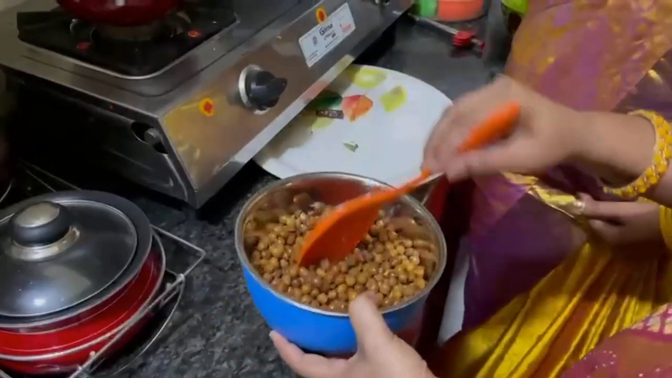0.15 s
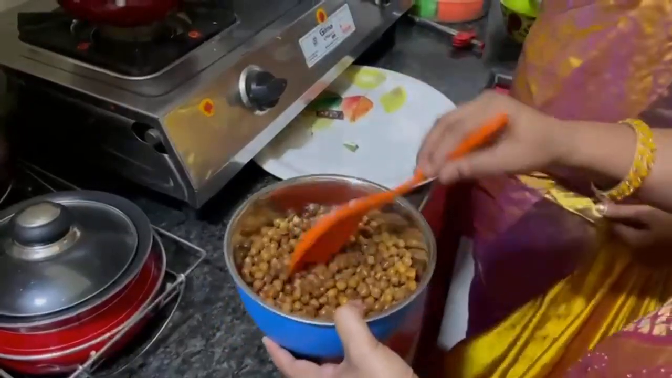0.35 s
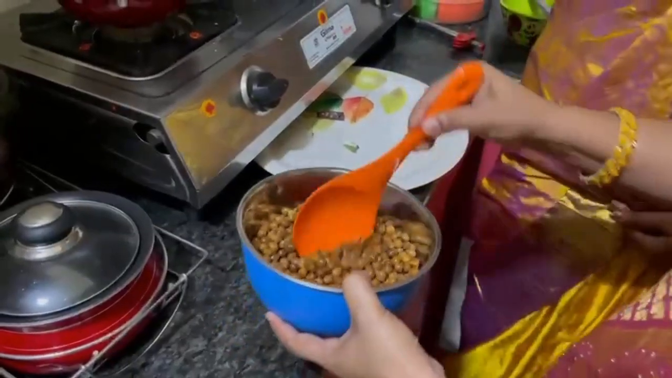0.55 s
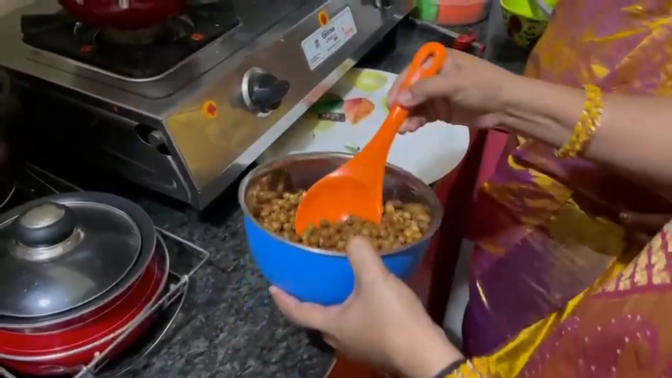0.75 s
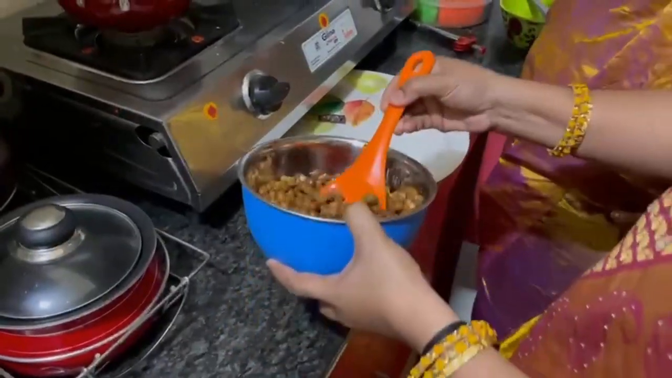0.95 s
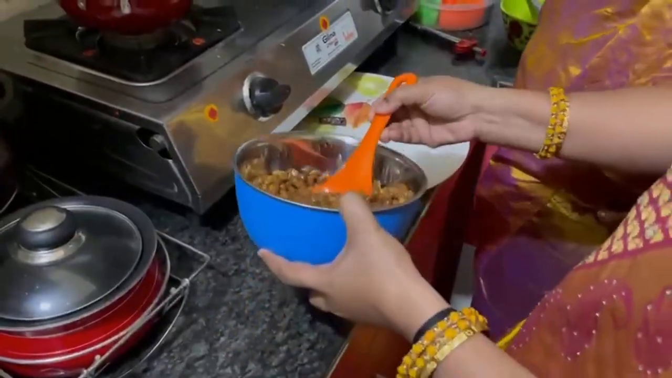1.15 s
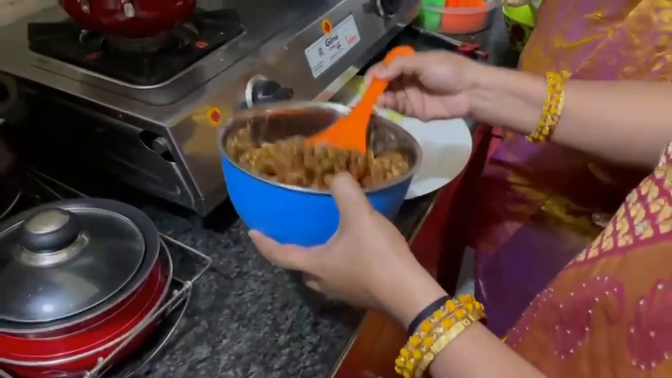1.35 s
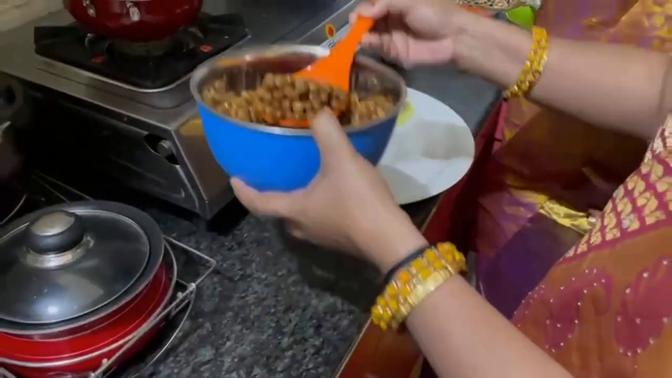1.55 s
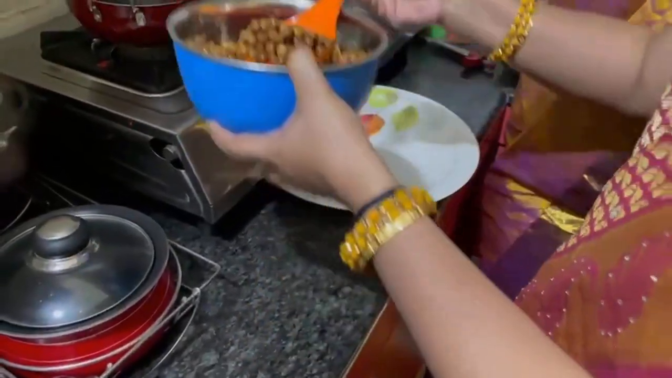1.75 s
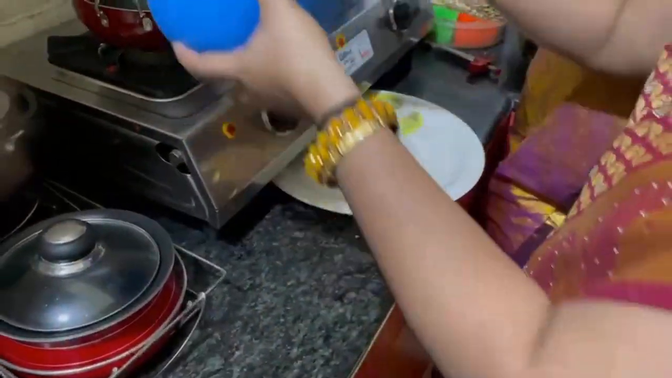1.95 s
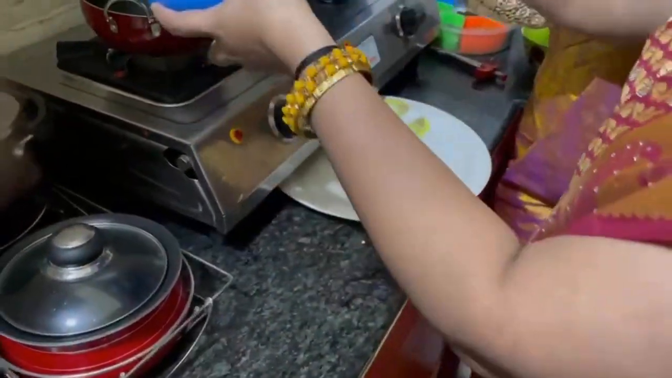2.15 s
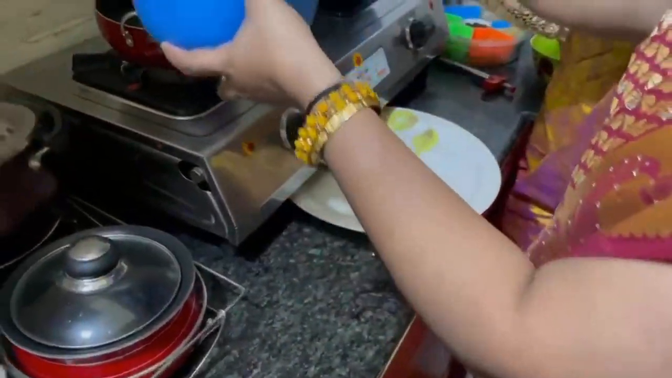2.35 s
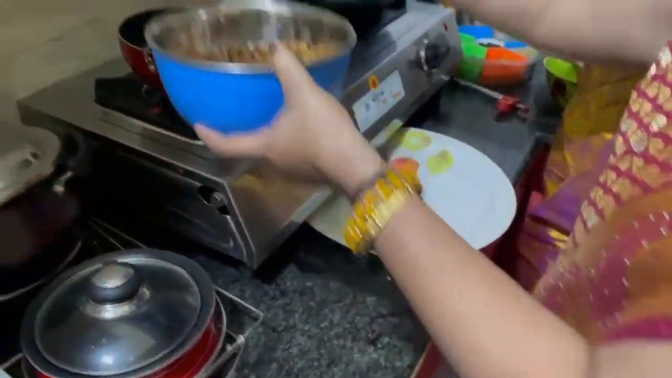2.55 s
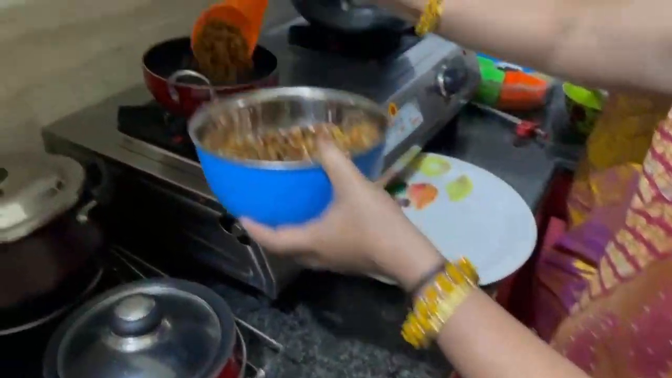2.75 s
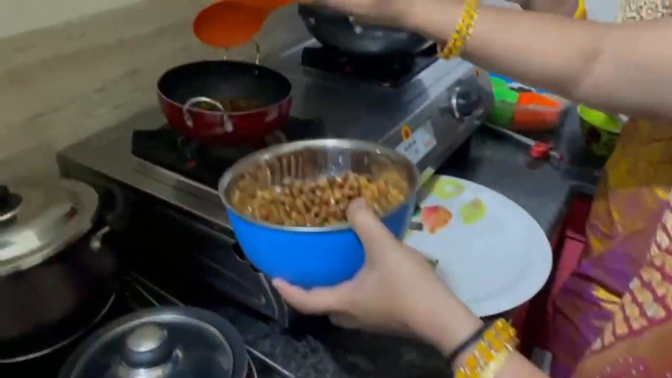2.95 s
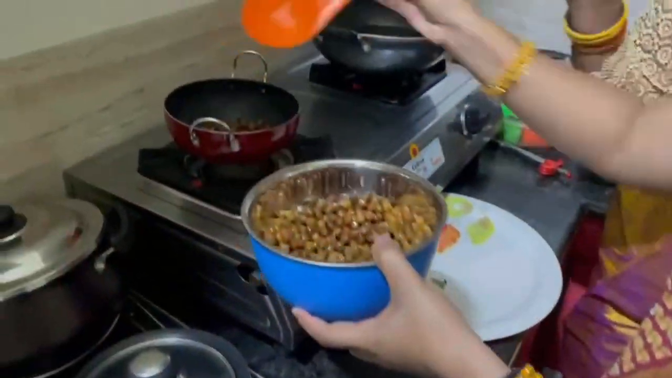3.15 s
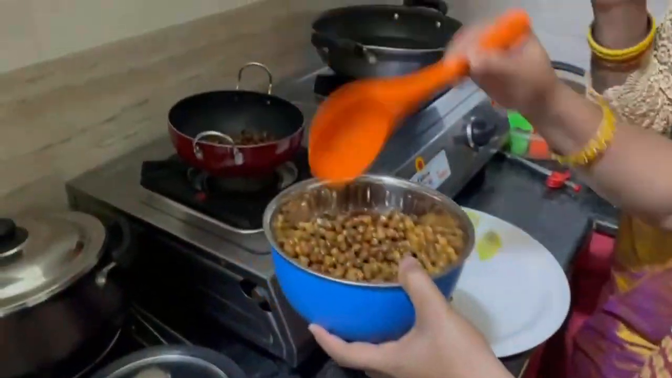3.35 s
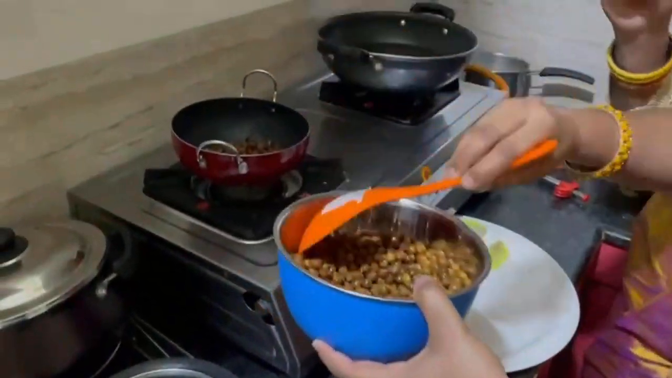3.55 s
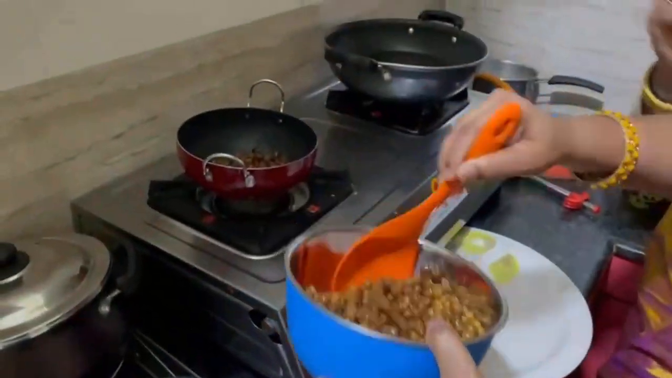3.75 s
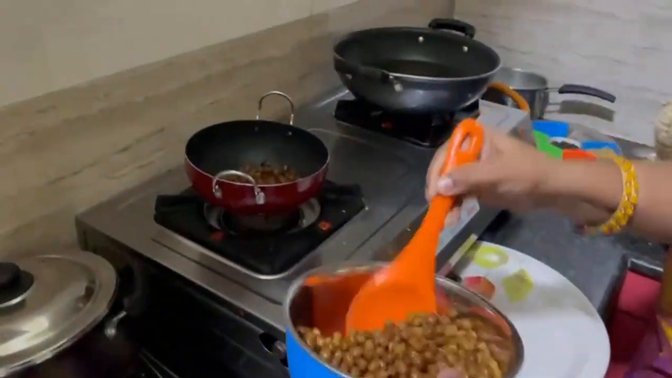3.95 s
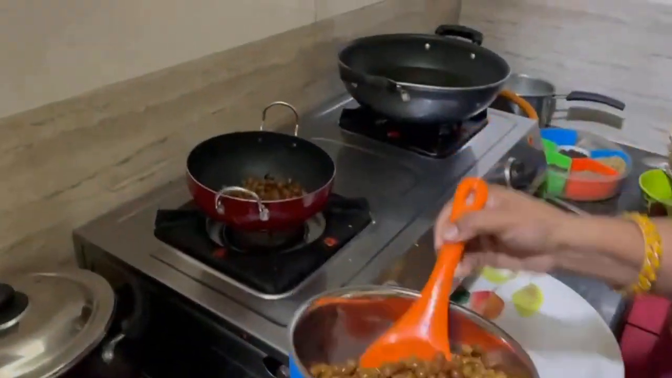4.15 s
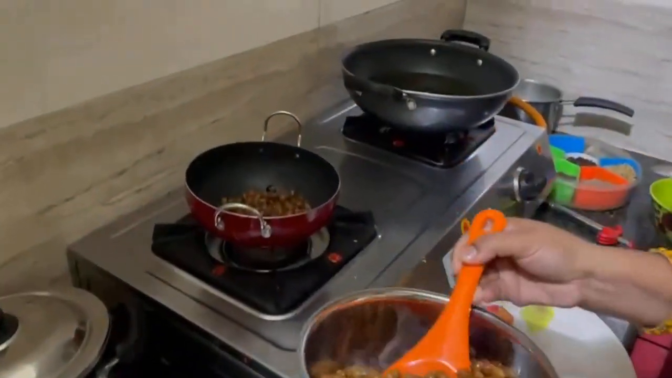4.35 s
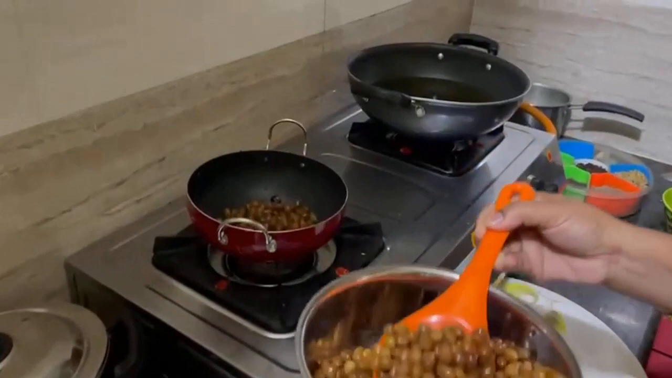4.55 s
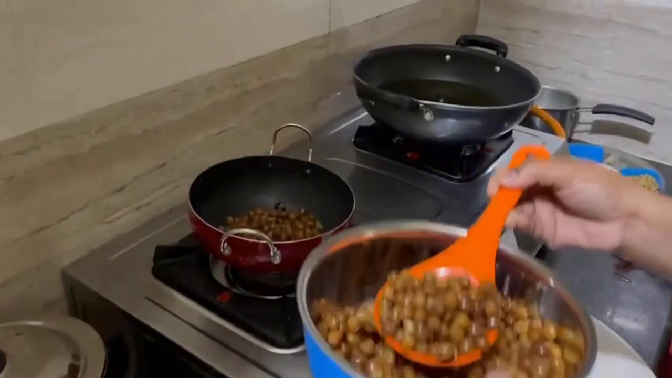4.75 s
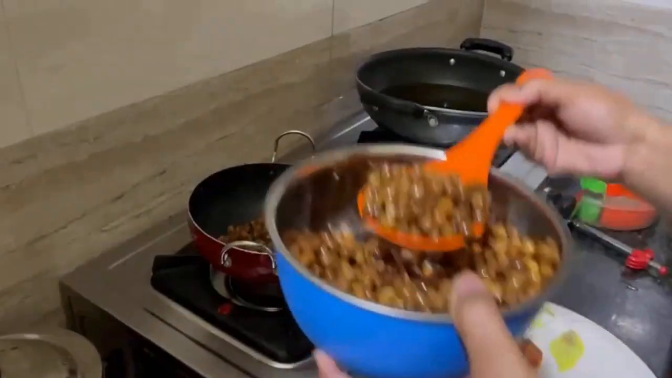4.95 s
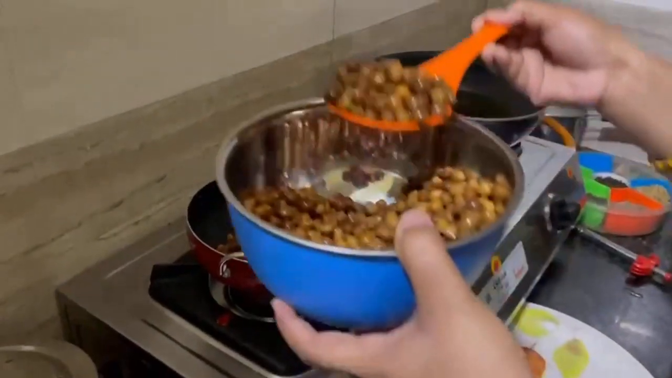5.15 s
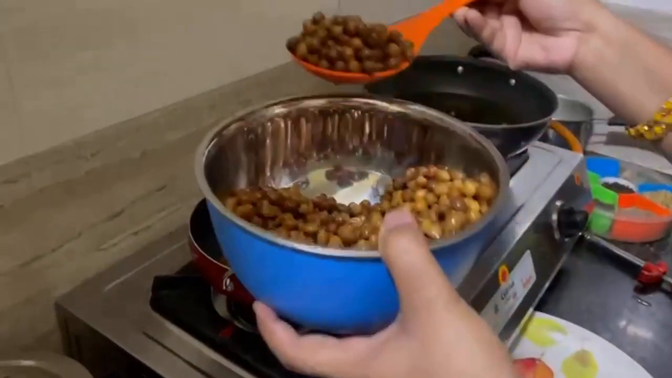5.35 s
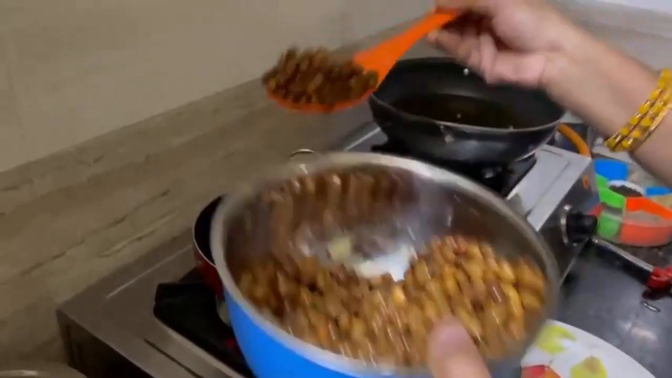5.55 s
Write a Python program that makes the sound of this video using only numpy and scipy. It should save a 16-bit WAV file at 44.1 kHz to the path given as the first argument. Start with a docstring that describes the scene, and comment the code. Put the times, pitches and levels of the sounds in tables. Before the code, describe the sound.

Chickpeas click and knock in a ringing steel bowl before hitting a pan of oil with sharp crackles and a steady sizzle.

```python
"""A plastic ladle stirs chickpeas in a hand-held steel bowl over a low kitchen rumble: the peas click,
roll and knock, and the steel rings in its modes. At about 2.7 s they are tipped into a pan of hot oil,
where steam bubbles burst in a sizzle and drops of water spit. From about 3.6 s the ladle digs into the
bowl again, scraping and rubbing, while the frying goes on. Two microphone ports hear it all."""
import sys
import numpy as np
from scipy import signal
from scipy.fft import rfft, irfft, next_fast_len
from scipy.io import wavfile
from scipy.ndimage import uniform_filter1d

SR = 44100
rng = np.random.default_rng(int(sys.argv[2]) if len(sys.argv) > 2 else 0)


def output_pcm(signal):
    """Save a mono or channel-first signal as 16-bit PCM at the path in sys.argv[1].

    Samples are clipped to [-1, 1] before scaling.
    """
    pcm = np.clip(np.atleast_2d(signal).T, -1, 1) * 32767
    wavfile.write(sys.argv[1], SR, np.round(pcm).astype(np.int16))


N = 250523
EVENT_SAMPLES = 8192

# Spectra of rumble, peas, fizz and oil. Each row: frequency in Hz, relative level in dB.
RUMBLE_SPECTRUM = [(13, -19), (22, -35), (37, -2.5), (59, 8.5), (112, 1), (161, -5), (193, -9),
                   (408, -8), (484, -20), (795, -19), (900, -58), (1170, -57), (1980, -120)]
PEA_SPECTRUM = [(500, -19), (900, -5.5), (1500, -9), (2500, -4.5), (4500, -8.5), (6000, -10), (7500, -15.5),
                (10000, -80)]
FIZZ_SPECTRUM = [(4000, -28.5), (6000, -9.5), (8000, -4), (10000, -4.5), (11300, -6), (12000, -16.5)]
OIL_SPECTRUM = [(500, -20.5), (900, -9.5), (1500, -9.5), (2500, -6), (3800, -9), (6000, -8), (7500, -10),
                (10000, -35.5)]
# Stirred peas and frying oil. Each row: time in seconds, gain in dB, treble lift in dB.
STIRRING = [(0.0, -50, 6), (0.32, -56.5, 6.5), (0.5, -47.5, 2), (0.58, -54.5, 2.5), (0.86, -52, 1),
            (1.09, -52, -5), (1.19, -59.5, 6), (1.3, -52, 6.5), (1.54, -55, 1.5), (1.64, -51, 0.5),
            (1.86, -59.5, 3), (2.23, -62.5, 5), (2.42, -63, 7), (2.66, -68, 5.5), (2.72, -69, -8)]
FRYING = [(2.68, -53, -8.5), (2.91, -37, 1), (3.0, -44, 6.5), (3.21, -45, 4), (3.52, -44, 2),
          (3.71, -41.5, 2.5), (4.02, -42.5, 3.5), (4.77, -38.5, 3.5), (5.35, -39, 2.5), (5.68, -38.5, 4)]
# Ringing of the steel bowl that colours the clicking peas.
# Each row: centre in Hz, width in Hz, boost in dB.
BOWL_RESONANCES = [(1090, 140, 10), (1870, 160, 7), (2090, 120, 6), (3400, 200, 3), (4200, 150, 0),
                   (4750, 100, 2.5)]
# Peas tumbling against the wall. Each row: time in seconds, gain in dB, centre of the clatter in Hz.
TUMBLING = [(0, -46.5, 1080), (.24, -46, 1100), (.34, -49, 1080), (.58, -43, 1080), (.66, -38.5, 1400),
            (.8, -53, 1190), (.88, -40, 1380), (.95, -44, 1250), (.99, -48.5, 1150), (1.15, -48, 1050),
            (1.37, -46.5, 1180), (1.5, -47, 754), (1.6, -45.5, 950), (1.83, -54, 1170), (2.56, -62, 1070),
            (2.67, -54, 1170), (2.93, -40.5, 1080), (3.23, -51.5, 1080), (3.57, -42.5, 970),
            (3.72, -43.5, 840), (3.99, -37, 1080), (4.25, -47, 880), (4.32, -39, 1150), (4.36, -33, 1000),
            (4.45, -37.5, 900), (4.5, -30.5, 890), (4.56, -40, 770), (4.64, -43, 666), (4.78, -41, 920),
            (5.68, -46.5, 1080)]
# Drumming on the bottoms, low thrum and finest bubbles. Each row: time in seconds, gain in dB.
BOTTOM_DRIVE = [(0.0, -41.5), (0.12, -65), (0.36, -55.5), (1.03, -63.5), (1.69, -63), (1.83, -71),
                (2.7, -69), (2.74, -40), (2.86, -38.5), (3.34, -60), (3.51, -54.5), (3.56, -46),
                (3.62, -49), (4.27, -53), (4.46, -49), (4.86, -56.5), (5.68, -58.5)]
STOVE_DRIVE = [(0, -57), (.4, -62), (.85, -55), (1.5, -57.5), (2.1, -63.5), (2.7, -62), (2.9, -48),
               (3.35, -61), (3.62, -47), (3.8, -55.5), (4.45, -53.5), (4.52, -45), (4.76, -56), (4.9, -58),
               (5.68, -60.5)]
FIZZING = [(0.0, -58), (1.2, -64.5), (1.49, -57.5), (1.94, -60.5), (2.37, -72), (2.66, -65), (2.78, -45.5),
           (2.91, -41), (2.97, -41.5), (3.34, -45.5), (4.38, -37), (4.56, -36), (5.11, -37), (5.68, -38)]
# Modes of the bowl wall, the bottoms of bowl and pan, the stove with its counter, and the pan.
# Each row: frequency in Hz, gain in dB, time to decay by 60 dB in seconds.
WALL_MODES = [(428, 8, 0.049), (495, 2, 0.014), (592, 2.5, 0.24), (712, 2.5, 0.0059), (766, -8, 0.054),
              (812, -7, 0.12), (978, -7.5, 0.022), (1070, -2, 0.022), (1194, 6, 0.053), (1440, 5.5, 0.024),
              (1474, -8, 0.047)]
BOTTOM_MODES = [(231, -9.5, 0.088), (251, -2, 0.27), (276, -10, 0.08), (285.3, -2.5, 0.22),
                (310, -11, 0.12)]
STOVE_MODES = [(104, -21, 0.042), (118, -10, 0.11), (131, -3.5, 0.21), (165, -5, 0.032)]
PAN_MODES = [(1080, 7, 0.067), (1530, -13, 0.11), (1893, 1, 0.018), (2090, -1.5, 0.018), (2782, 4.5, 0.047),
             (3100, -10, 0.081), (3680, -6.5, 0.033), (4640, -3, .025), (4890, -9.5, 0.029),
             (5700, -17, 0.043), (6490, -5, 0.046)]
# Peas clicking and drops bursting. Each row: start in seconds, peak in dB, pitch in Hz,
# spray in dB relative to the peak.
CRACKS = [(0.0204, -29, 5700, -8.5), (0.0316, -24, 4270, -20), (0.045, -40, 4630, -28),
          (0.2433, -47, 3560, -12), (0.308, -28, 5170, -9), (0.399, -30, 3080, -12.5),
          (0.492, -33, 5000, -20), (0.613, -38, 4400, -6), (0.6727, -35, 3170, -14),
          (0.7066, -31, 4330, -19), (0.753, -38, 3620, -20), (0.7813, -37, 5200, -6),
          (0.8624, -23.5, 4040, -21), (0.873, -28.5, 3500, -18), (0.895, -31, 6000, -13),
          (0.9976, -30.5, 4050, -19), (1.004, -29, 4450, -21), (1.2137, -34, 6000, -14),
          (1.248, -37, 3150, -13), (1.2518, -33, 3370, -15), (1.263, -32, 5240, -22),
          (1.274, -26, 4540, -19), (1.279, -23.5, 4070, -24), (1.3005, -29, 3240, -16),
          (1.4160, -31, 4430, -17), (1.4749, -34, 3500, -9), (1.5682, -35, 3720, -15),
          (1.6336, -29.5, 2580, -20), (1.64, -34, 10100, -18), (1.6731, -27.5, 4600, -14),
          (1.6857, -28.5, 5430, -12), (1.8814, -44, 6550, -3), (1.8966, -40, 3930, -3.5),
          (2.01, -42, 6600, -1), (2.0928, -32, 5200, -15), (2.1375, -34, 9600, -24),
          (2.1388, -31, 10100, -16), (2.158, -40, 5820, -17), (2.238, -43, 3020, -5.5),
          (2.282, -34.5, 5670, -18), (2.295, -35.5, 3600, -8.5), (2.3455, -28, 4000, -18),
          (2.4995, -38.5, 5600, -20), (2.726, -40, 4200, -3.5), (2.7728, -32, 5300, -4),
          (2.8306, -18.5, 5330, -15.5), (2.8466, -7.5, 5380, -24), (2.8569, -8, 5750, -17),
          (2.86, -16, 5400, -30), (2.863, -12, 5240, -28), (3.0466, -13.5, 6490, -12.5),
          (3.0475, -20, 3200, -15), (3.0656, -18, 4200, -9.5), (3.0887, -34, 4230, -6),
          (3.2475, -29, 5910, -16), (3.4417, -29.5, 6500, -6.5), (3.5424, -23, 6500, -7),
          (3.7994, -31, 4830, -2.5), (4.1807, -12.5, 7030, -22), (4.255, -34, 6800, -17),
          (4.6547, -27, 2850, -14), (4.8299, -28, 6490, -12), (5.105, -26, 8300, -18),
          (5.158, -20.5, 4840, -17), (5.5388, -21, 4430, -16)]
# Ladle and peas striking the bowl. Each row: start in seconds, gain in dB, pitch in Hz,
# decay constant in cycles, relative level of the rattle in dB.
IMPACTS = [(0.037, -33.5, 1200, 4.4, -6), (0.282, -31, 1190, 6.5, -16), (0.395, -26.5, 1080, 10, -11.5),
           (0.504, -31.5, 1176, 9.1, -10), (0.667, -28, 1530, 11, -12), (0.689, -35, 428, 3, -23),
           (0.753, -27, 1460, 3.3, -32), (0.871, -21.5, 1510, 3.3, -23), (0.899, -26.5, 1370, 4.7, -16),
           (1.108, -30, 1070, 2.3, -8.5), (1.276, -35.5, 1070, 11, -21), (1.393, -31.5, 2090, 5.5, -10),
           (1.632, -21.5, 1030, 1.7, -11), (1.756, -37, 1280, 2.4, -6), (2.092, -40, 2530, 3.3, -7.5),
           (2.226, -43, 1900, 5.5, -9), (2.335, -39.5, 1090, 4.4, -6), (2.6086, -40.5, 1080, 6.8, 2.5),
           (2.624, -43, 2230, 6, 0.5), (2.77, -25.5, 1210, 9, -21), (2.846, -22.5, 1070, 7, -8),
           (2.859, -18, 1090, 6.3, -8), (3.045, -24.5, 1080, 7.9, -5), (3.067, -19, 2090, 7.5, -9.5),
           (3.547, -27.5, 526, 2.9, -1.5), (3.553, -30, 285, 2.4, -20), (3.628, -33, 2380, 7.5, -15),
           (3.648, -25, 2160, 5.4, -13), (3.683, -21, 1730, 5.4, -15), (3.688, -34, 600, 1.4, -18),
           (3.7, -25, 1790, 5.1, -5.5), (3.724, -26, 2330, 22, -13), (3.728, -36, 815, 2.6, -22),
           (3.968, -26.5, 1070, 5, -8), (3.996, -27, 895, 1.1, -5.5), (4.032, -37, 1480, 2.8, -14),
           (4.127, -20.5, 1450, 2.2, -15), (4.162, -23.5, 1080, 3.7, -20), (4.174, -27.5, 750, 5, -20),
           (4.211, -32, 1010, 4, -20), (4.35, -28.5, 817, 7.6, -10), (4.402, -23, 824, 8.3, -19),
           (4.466, -26, 836, 5, -17), (4.493, -23, 814, 4.1, -17), (4.524, -24.5, 910, 3.3, -17),
           (4.568, -17, 700, 1.6, -33), (4.642, -26.5, 687, 3.4, -4.5)]
# Ladle in the peas, and on the wall. Each row: start in seconds, length in seconds, level in dB,
# centre frequency in Hz.
LADLE_PUSHES = [(0.253, 0.12, -47, 1120), (0.484, 0.057, -46, 1160), (0.63, 0.055, -47, 1440),
                (1.249, 0.085, -42.5, 2600), (1.742, 0.047, -43.5, 1530), (3.588, 0.081, -41, 2330),
                (3.668, 0.054, -40, 1550), (3.756, 0.056, -37, 2100), (3.943, 0.12, -43, 1440),
                (4.095, 0.051, -43, 1400), (4.136, 0.096, -40.5, 1060)]
LADLE_RUBS = [(1.43, .12, -53, 590), (4.335, .13, -42, 815), (4.455, .11, -45, 835), (4.575, .1, -42, 592),
              (4.49, 0.285, -46.5, 148)]
# The two ports. Each row: frequency in Hz, phase lead of the left in half turns, coherence from 0 to 1,
# left minus right level in dB.
PORT_RESPONSE = [(30, 0, .97, -.5), (350, .05, .8, -1.8), (1000, .1, .68, .3), (1850, .2, .15, .3),
                 (2800, .2, .43, 3), (3800, .01, .75, 1.2), (5200, .1, .45, 3.2), (6000, -.02, .8, 1.2),
                 (6900, -.4, .5, .4), (7300, -.85, .7, .1), (7600, -1, 1, 0), (9000, -1, 1, 0),
                 (9350, -1.15, .75, 0), (9900, -1.6, .55, 0), (10900, -2, .97, 0), (11400, -2, 1, 0),
                 (13000, -2, 1, 0)]


def undb(db):
    """Decibels as an amplitude ratio."""
    return 10 ** (np.asarray(db) / 20)


def level(x, db):
    """Scale x to an rms level."""
    return x * undb(db) / np.sqrt(np.mean(x ** 2))


def curves(table):
    """Linear interpolation of a time table, one value a sample."""
    times, *columns = np.transpose(table)
    return [np.interp(np.arange(N) / SR, times, column) for column in columns]


def walk(per_s):
    """Slow random modulation: smoothed steps with a spread of order 1."""
    hold = int(SR / per_s)
    steps = np.repeat(rng.standard_normal(N // hold + 1), hold)
    return 2.32 * uniform_filter1d(uniform_filter1d(steps, hold), hold)[:N]


def band(x, hz, ratio):
    """Band-pass from hz / ratio to hz * ratio, rms 1."""
    edges = [hz / ratio, min(hz * ratio, .45 * SR)]
    return level(signal.sosfilt(signal.butter(1, edges, "band", fs=SR, output="sos"), x), 0)


def colour(x, spectrum, resonances=()):
    """Minimum-phase filtering by a spectrum with added resonance peaks."""
    hz = np.arange(2049) * SR / 4096 + 1
    points_hz, points_db = np.transpose(spectrum)
    db = np.interp(np.log(hz), np.log(points_hz), points_db)
    for centre, width, boost in resonances:
        db = db + boost / (1 + (2 * (hz - centre) / width) ** 2)
    cepstrum = irfft(np.log(undb(db)))
    cepstrum[1:2048] *= 2  # folding makes the filter causal
    cepstrum[2049:] = 0
    return signal.fftconvolve(x, irfft(np.exp(rfft(cepstrum))))[:N]


def ring(x, modes):
    """Forced response of damped oscillators, one row a mode."""
    out = []
    for hz, db, t60 in modes:
        radius = np.exp(-np.log(1000) / (t60 * SR))
        feedback = [1, -2 * radius * np.cos(2 * np.pi * hz / SR), radius * radius]
        out.append(undb(db) * signal.lfilter([1 - radius, 0, radius - 1], feedback, x))
    return np.array(out)


def clicks(per_s, spread_db):
    """A Poisson train of impulses, most small and a few large; rms 1."""
    most = 16384
    when = np.flatnonzero(rng.random(N) < per_s / SR)[:most]
    sizes = undb(spread_db * np.minimum(rng.exponential(size=most), 3.5)) * rng.standard_normal(most)
    out = np.zeros(N)
    out[when] = sizes[:len(when)]
    return level(out, 0)


def grains(centres_hz, gains_db, per_s, spread_db, bed_db, flicker_db):
    """Shot noise: each band has its own clicks over a dense bed, and flickers mostly alone."""
    out, shared = 0, walk(45)
    for hz, db in zip(centres_hz, gains_db):
        noise = clicks(per_s, spread_db) + undb(bed_db) * rng.standard_normal(N)
        bandpass = signal.butter(2, [hz / 1.12, hz * 1.12], "band", fs=SR, output="sos")
        part = level(signal.sosfilt(bandpass, noise), 10 * np.log10(hz / 3000))
        out = out + part * undb(db + flicker_db * (walk(40) + 0.34 * shared))
    return out


def rustle(db, treble_db, spectrum, resonances=(), **texture):
    """Broadband shot noise with a treble shelf above 2400 Hz."""
    centres_hz = 650 * 1.225 ** np.arange(14)
    gains_db = [db + treble_db * np.clip(np.log2(hz / 2400), 0, 1) for hz in centres_hz]
    return colour(grains(centres_hz, gains_db, **texture), spectrum, resonances)


def agitated(db, events, step_db, rise_s, t60):
    """Incoherent powers add: a level in dB leaps at each event and relaxes."""
    kicks = np.zeros(N)
    for start, event_db, *_ in events:
        kicks[int(start * SR)] += undb(2 * (event_db + step_db))
    fall, rise = undb(-2 * 60 / (t60 * SR)), np.exp(-1 / (rise_s * SR))
    decaying = signal.lfilter([1], [1, -fall], kicks)
    power = signal.lfilter([1 - rise], [1, -rise], decaying)
    return 10 * np.log10(undb(2 * db) + power)


def struck(modes, db, blow_hz, ratio, share=1):
    """Random excitation: modes under a hail of soft blows whose strength follows db."""
    hail = clicks(per_s=900, spread_db=3.5) + undb(-0.5) * rng.standard_normal(N)
    blows = band(hail, blow_hz, ratio)
    return (share * ring(blows * undb(db), modes)).sum(0) / np.std(ring(blows, modes).sum(0))


def near_pitch(centre_hz, far_db):
    """Resonance: the wall modes nearest the pitch of a contact respond most."""
    octaves = np.log2(np.transpose(WALL_MODES)[0][:, None] / centre_hz)
    return undb(5.5 - np.minimum(70 * octaves ** 2, far_db))


def envelope(t, db, rise_s, t60):
    """Exponential decay with a linear onset."""
    return undb(db - 60 * t / t60) * np.minimum(t / rise_s, 1)


def kitchen_rumble():
    """Low-frequency noise wavers under slight amplitude modulation."""
    return level(colour(rng.standard_normal(N), RUMBLE_SPECTRUM) * undb(0.4 * walk(6.17)), db=-57)


def rolling_peas():
    """Granular collisions: moist peas click until tipped out; each loud click jostles the rest."""
    stirring = np.arange(N) / SR < STIRRING[-1][0]
    db, treble_db = curves(STIRRING)
    db = agitated(db, CRACKS, step_db=-21.5, rise_s=0.0019, t60=0.085)
    return stirring * rustle(db, treble_db, PEA_SPECTRUM, BOWL_RESONANCES,
                             per_s=450, spread_db=2.5, bed_db=-0.5, flicker_db=2)


def ringing_steel():
    """Forced vibration: tumbling peas keep the bowl wall, the bottoms and the stove ringing."""
    wall_db, centre_hz = curves(TUMBLING)
    # Peas slide down the wall after each knock.
    wall_db = agitated(wall_db + 1.32 * walk(45), IMPACTS, step_db=-12.5, rise_s=0.014, t60=0.16)
    wall = struck(WALL_MODES, wall_db, blow_hz=454, ratio=1.86, share=near_pitch(centre_hz, far_db=17.5))
    bottom = struck(BOTTOM_MODES, curves(BOTTOM_DRIVE)[0] + walk(15), blow_hz=261.3, ratio=1.12)
    stove = struck(STOVE_MODES, curves(STOVE_DRIVE)[0] + 2.1 * walk(15), blow_hz=132, ratio=1.41)
    return wall + bottom + stove


def fizz():
    """Small bubbles sound high: the finest in the oil hiss throughout, more after each crack."""
    db = agitated(curves(FIZZING)[0], CRACKS, step_db=-28, rise_s=0.0041, t60=0.16)
    centres_hz = [5660, 6760, 8270, 9950, 11600]
    gains_db = [db + offset for offset in (-0.1, -0.1, 0.13, -3.5, -3.5)]
    hiss = grains(centres_hz, gains_db, per_s=1100, spread_db=11.5, bed_db=7.5, flicker_db=1.61)
    return colour(hiss, FIZZ_SPECTRUM)


def cracks():
    """Damped transients: a pea clicks or a drop bursts, with a spray; during frying the pan pings."""
    out, t = np.zeros(N + EVENT_SAMPLES), np.arange(EVENT_SAMPLES) / SR
    shape, decay_cycles = (len(CRACKS), EVENT_SAMPLES), 1.58
    mists = rng.standard_normal(shape) * undb(7 * np.minimum(rng.exponential(size=shape), 3.5))
    for (start, db, hz, spray_db), mist in zip(CRACKS, mists):
        tone = np.sin(2 * np.pi * hz * t) + undb(-13.5) * np.sin(2 * np.pi * 1.89 * hz * t)
        crack = tone * t * np.exp(-t * hz / decay_cycles)
        spray = envelope(t, spray_db, rise_s=0.0073, t60=0.19) * band(mist, hz, 1.275)
        at = int(start * SR)
        out[at:at + EVENT_SAMPLES] += undb(db) * (crack / np.abs(crack).max() + spray)
    frying = np.arange(N) / SR > FRYING[0][0]
    return out[:N] + undb(-0.5) * ring(frying * out[:N], PAN_MODES).sum(0)


def knocks():
    """Impact and free decay: a clack and a thud, jostled peas rattle, and the wall rings on."""
    out, t = np.zeros(N + EVENT_SAMPLES), np.arange(EVENT_SAMPLES) / SR
    clack_t60, rise_cycles, rattle_hz = 0.012, 0.5, 1970
    grits = rng.standard_normal((len(IMPACTS), EVENT_SAMPLES))
    impulse_responses = ring(1. * (t == 0), WALL_MODES)
    for (start, db, hz, cycles, rattle_db), grit in zip(IMPACTS, grits):
        clack = undb(-6.5 - 60 * t / clack_t60) * np.sin(2 * np.pi * 2.21 * hz * t)
        thud = np.sin(2 * np.pi * hz * t) + clack
        thud *= np.exp(-t * hz / cycles) * np.minimum(t * hz / rise_cycles, 1)
        rattle = band(band(grit, rattle_hz, 1.34), rattle_hz, 1.34)
        rattle *= envelope(t, rattle_db, rise_s=0.0036, t60=0.12)
        wall = undb(9.5) * (near_pitch(hz, far_db=29) * impulse_responses).sum(0)
        at = int(start * SR)
        out[at:at + EVENT_SAMPLES] += undb(db) * (undb(-1.5) * thud / np.abs(thud).max() + rattle + wall)
    return out[:N]


def scrapes():
    """Rolling contact: peas crunch over the ladle, swelling and fading with each push."""
    out, contacts = np.zeros(N), clicks(per_s=740, spread_db=3)
    for start, length, db, hz in LADLE_PUSHES:
        at, count = int(start * SR), int(length * SR)
        crunch = band(contacts[at:at + count] + 1e-9, hz, 1.13)
        out[at:at + count] += undb(db) * np.hanning(count) ** 0.57 * crunch
    return out


def rubs():
    """Stick-slip friction of the ladle edge feeds a single long-ringing mode."""
    out, slips, t60 = np.zeros(N), clicks(per_s=2000, spread_db=-1.5), 0.27
    for start, length, db, hz in LADLE_RUBS:
        at, count = int(start * SR), int(length * SR)
        tone = ring(slips, [(hz, 0, t60)])[0, at:at + count]
        out[at:at + count] += np.hanning(count) ** 0.4 * level(tone, db)
    return out


def sizzle():
    """Boiling: steam bubbles burst in the oil and drive the pan's modes from ever-changing spots."""
    frying = np.arange(N) / SR > FRYING[0][0]
    bubbles = rustle(*curves(FRYING), OIL_SPECTRUM, per_s=500, spread_db=1.5, bed_db=4, flicker_db=1.17)
    pan = sum(mode * undb(2 * walk(22)) for mode in ring(bubbles, PAN_MODES))
    return frying * (bubbles + pan)


def reflections(x, t60=0.19, db=-9, rise_s=0.0067):
    """Reverberation: convolution with noise that builds up and decays."""
    t = np.arange(int(t60 * SR)) / SR
    tail = rng.standard_normal(N)[:len(t)] * undb(-60 * t / t60) * np.minimum(t / rise_s, 1) ** 2
    return signal.fftconvolve(x, undb(db) * tail / np.sqrt(np.sum(tail ** 2)))[:N]


def scene():
    """Partial coherence: the right port hears the left's sound and other spots, shifted in phase."""
    hits, size = knocks() + cracks(), next_fast_len(N)
    spots = [hit_gain * hits + scrapes() + rubs() + rolling_peas() + sizzle() + fizz() + ringing_steel()
             for hit_gain in (1, .6)]
    left, other = (rfft(x + reflections(x) + kitchen_rumble(), size) for x in spots)
    hz = np.fft.rfftfreq(size, 1 / SR)
    port_hz, *columns = np.transpose(PORT_RESPONSE)
    lead, coherence, balance_db = (np.interp(hz, port_hz, column) for column in columns)
    right = np.exp(-1j * np.pi * lead) * (coherence * left + np.sqrt(1 - coherence ** 2) * other)
    return irfft(np.array([left * undb(balance_db / 2), right * undb(-balance_db / 2)]), size)[:, :N]


def record(dry):
    """Band limiting: the phone cuts the treble steeply above 11950 Hz."""
    return signal.sosfilt(signal.ellip(12, .2, 60, 11950, fs=SR, output="sos"), dry)


dry = scene()
out = record(dry)
output_pcm(out)
```